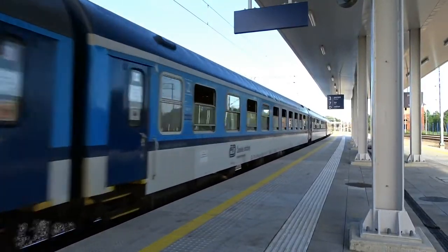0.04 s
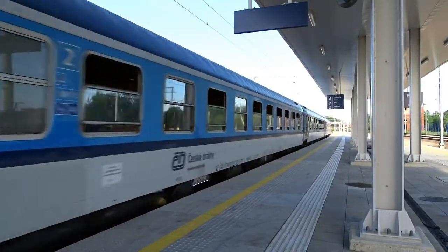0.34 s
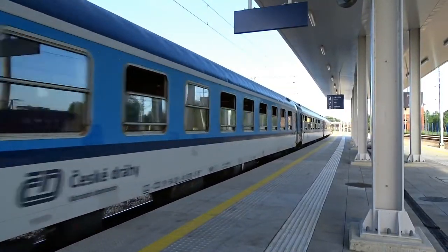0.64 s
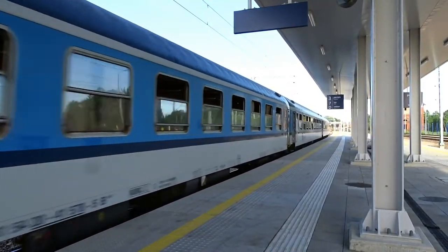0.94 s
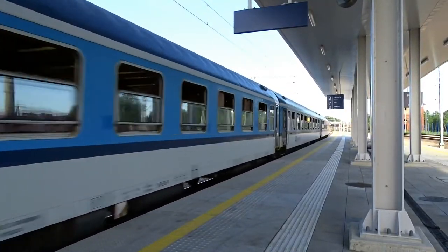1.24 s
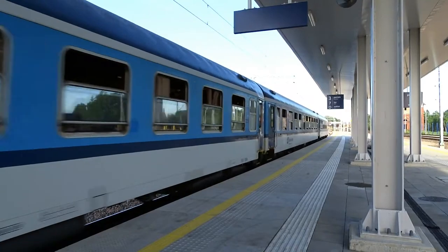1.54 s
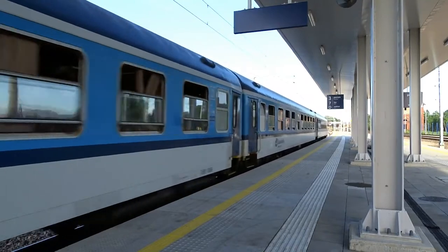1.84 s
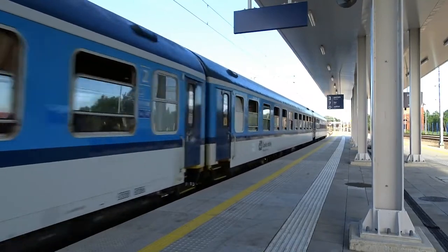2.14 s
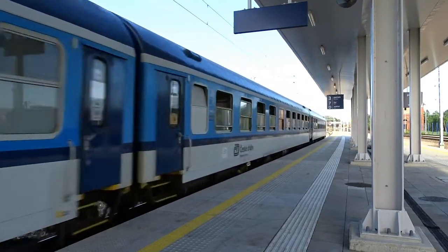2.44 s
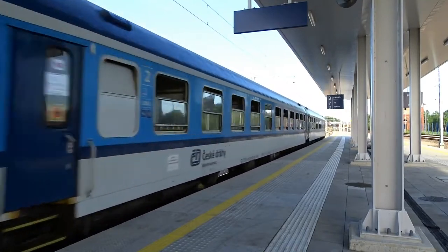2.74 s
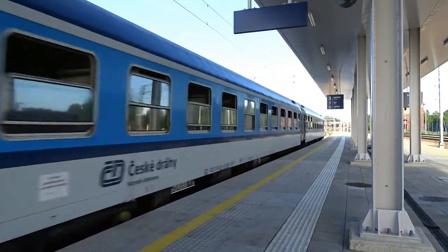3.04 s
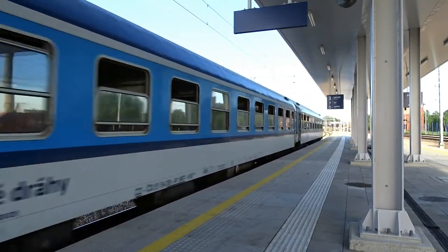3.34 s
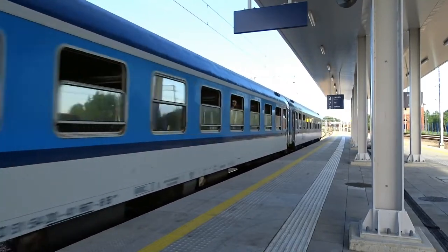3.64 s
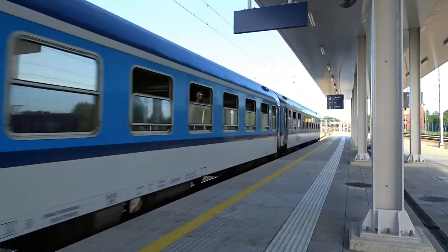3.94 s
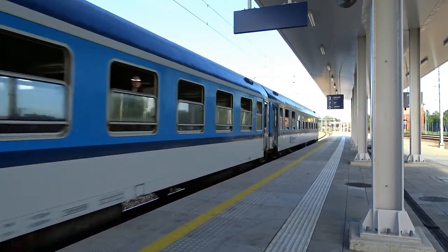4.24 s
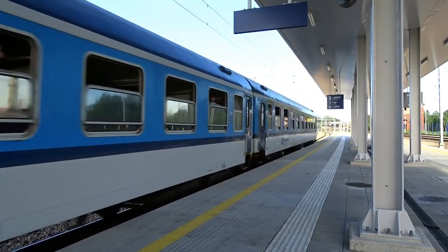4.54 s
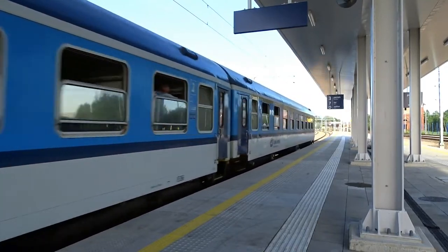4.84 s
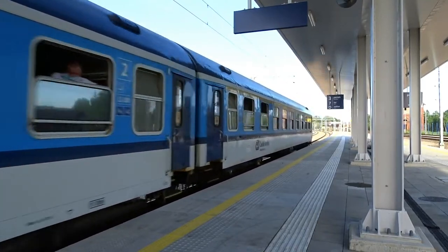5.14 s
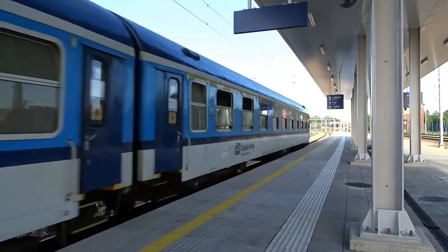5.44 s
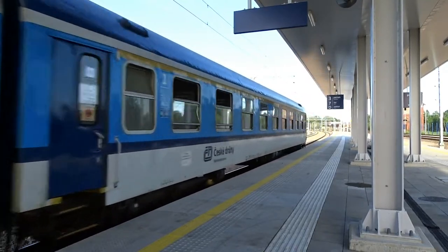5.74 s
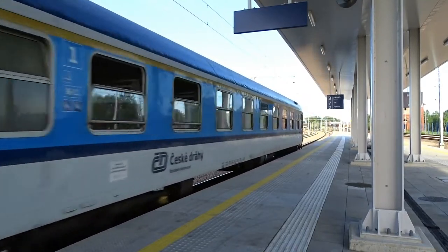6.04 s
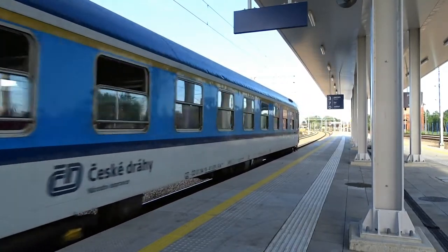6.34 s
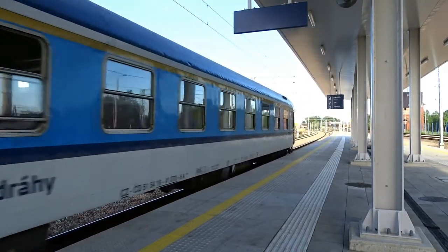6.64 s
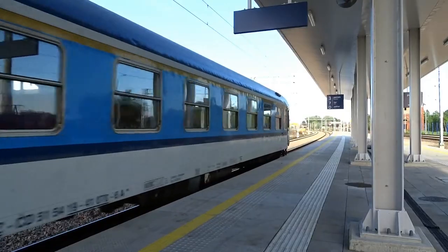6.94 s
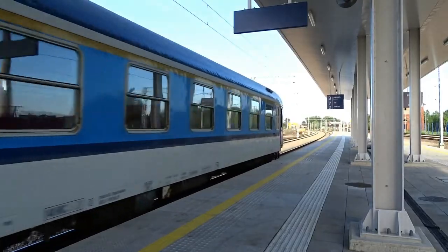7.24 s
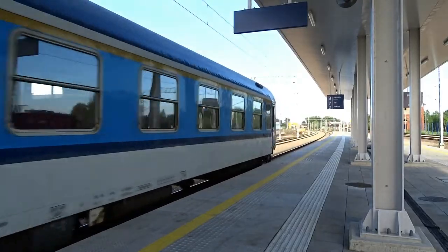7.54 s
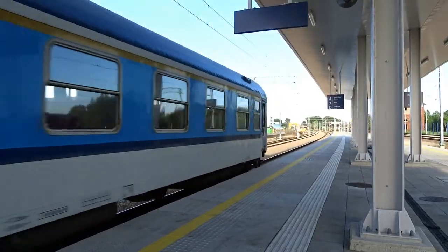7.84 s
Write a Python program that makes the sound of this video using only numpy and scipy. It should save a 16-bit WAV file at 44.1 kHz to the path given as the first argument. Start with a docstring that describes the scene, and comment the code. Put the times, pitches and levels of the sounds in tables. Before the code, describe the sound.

A braking train passes close by, its rumble and hiss sinking while shrill squeals build and end in short pips and squeaks.

```python
"""A roar of wheels on rails opens the scene: coaches roll close by, braking along a roofed platform.
Surface roughness excites this rolling noise, which sinks as smoother-running coaches arrive.
Brake friction drives high wheel modes into self-excited vibration: each squeal is a cluster of many
wheels, blurred by reflections. Bogies drone, steel parts ring and one singing wheel sweeps past;
later the brakes catch in short pips and bite with a rough squeak."""
import sys
import numpy as np
from scipy import signal
from scipy.fft import rfft, irfft, next_fast_len
from scipy.io import wavfile
from scipy.ndimage import uniform_filter1d

SR = 44100
rng = np.random.default_rng(int(sys.argv[2]) if len(sys.argv) > 2 else 0)


def unload_audio(sound):
    """Save the sound as a 16-bit wav file, at the path given as the first command line argument."""
    columns = np.transpose(np.atleast_2d(sound))
    # keep every value between -1 and 1, then stretch to whole-number steps
    steps = np.round(np.clip(columns, -1, 1) * 32767)
    wavfile.write(sys.argv[1], SR, steps.astype(np.int16))


N = 356769
TIME = np.arange(N) / SR


def from_db(db):
    """Logarithmic level: 20 dB is a tenfold amplitude."""
    return np.exp(np.asarray(db) * (np.log(10) / 20))


def unit_power(x):
    """Normalisation to a mean square of 1."""
    return x / np.sqrt(np.vdot(x, x).real / x.size + 1e-20)


def in_time(rows):
    """Linear interpolation of each column at every sample."""
    times, *columns = np.transpose(rows)
    return [np.interp(TIME, times, column) for column in columns]


def at_hz(points, hz):
    """Interpolation on a logarithmic frequency axis."""
    freqs, values = np.transpose(points)
    return np.interp(np.log(hz), np.log(freqs), values)


def flutter(rate_hz, order=2):
    """Low-pass filtered noise: a complex random envelope of unit power, whose rate may vary."""
    steps = 48   # per cycle
    clock = np.cumsum(np.broadcast_to(rate_hz, N)) * steps / SR + 2 * steps   # starts after a run-in
    pole = np.exp(-2 * np.pi / steps)
    motion = rng.standard_normal((2, int(clock[-1]) + 2))
    for _ in range(order):
        motion = signal.lfilter([1 - pole], [1, -pole], motion)
    return unit_power(np.interp(clock, np.arange(motion.shape[1]), motion[0] + 1j * motion[1]))


def drift(rate_hz):
    """Random modulation: a slow real signal of unit power."""
    return unit_power(flutter(rate_hz).real)


def swell(middle_s, length_s, peak_db, time=TIME):
    """Gaussian envelope whose length lies between its half-power points."""
    return from_db(peak_db) * np.exp2(-2 * np.minimum(((time - middle_s) / length_s) ** 2, 10))


def overlap(rows):
    """Incoherent addition of swells: their power-weighted pitch and the gain of their summed powers."""
    powers = np.array([swell(s, length, db) ** 2 for s, length, _, db in rows])
    total = powers.sum(axis=0)
    return np.array([hz for _, _, hz, _ in rows]) @ powers / total, np.sqrt(total)


def stereo(direct, reflected, coherence, pan_db):
    """Interaural coherence: direct sound is common to both ears, reflections differ."""
    coherence = np.clip(coherence, 0, 1)
    side = reflected * np.sqrt((1 - coherence) / (1 + coherence))
    return np.array([(direct + side) * from_db(pan_db / 2), (direct - side) * from_db(-pan_db / 2)])


# likeness of the noise at the two ears: (frequency [Hz], coherence [0-1])
EAR_COHERENCE = [(30, 0.99), (200, 1), (600, 0.98), (1100, 0.86), (1700, 0.95), (2400, 0.8), (3300, 0.94),
                 (4600, 0.87), (5200, 1), (9300, 1), (10000, 0.46), (10700, 1)]
# interaural level difference: (frequency [Hz], left minus right [dB])
EAR_BALANCE = [(100, .2), (300, 0.5), (1050, 2.5), (1500, 1.1), (2300, 2), (4200, 1), (5400, 2), (8500, 0),
               (10000, 0.5), (15000, -0.5)]
# interaural phase difference: (frequency [Hz], left minus right [rad])
EAR_PHASE = [(40, -.03), (200, -0.28), (500, -0.58), (1000, -0.7), (2000, -0.5), (4000, -0.2), (5300, 0)]
def contact_noise(spectrum, flicker_db, flicker_hz):
    """Random excitation: coloured stereo noise whose level flickers with the roughness of the contact."""
    size = next_fast_len(N)
    direct, reflected = rfft(rng.standard_normal((2, size)))
    hz = np.maximum(np.arange(len(direct)) * SR / size, 1)
    band_edges = 1 / (1 + (spectrum[0][0] / 2 / hz) ** 4 + (hz / 2 / spectrum[-1][0]) ** 4)
    ears = stereo(direct, reflected, at_hz(EAR_COHERENCE, hz), at_hz(EAR_BALANCE, hz))
    ears *= from_db(at_hz(spectrum, hz)) * band_edges
    ears[0] *= np.exp(1j * at_hz(EAR_PHASE, hz))
    return unit_power(irfft(ears, size)[:, :N]) * from_db(flicker_db * drift(flicker_hz))


def wheel_mode(tone, nominal_width_hz, core_share, flutter_hz, warble_hz, coherence, pan_db):
    """Superposition: the nearest wheel's warbling core tone lies in a broad cluster from the others."""
    pitch, gain = tone
    width_hz = nominal_width_hz * np.maximum(1.38 - .072 * TIME, .5)   # narrows as fewer wheels remain
    core = flutter(flutter_hz)
    core = unit_power(core / np.sqrt(0.29 + np.abs(core) ** 2))   # friction saturates, evening the swing
    core = core * np.exp(2j * np.pi * np.cumsum(warble_hz * drift(14)) / SR)
    cluster, reflected = flutter(width_hz, order=4), flutter(width_hz, order=4)
    direct = np.sqrt(core_share) * core + np.sqrt(1 - core_share) * cluster
    carrier = np.sqrt(2) * np.exp(2j * np.pi * np.cumsum(pitch) / SR)
    return gain * stereo((direct * carrier).real, (reflected * carrier).real, coherence, pan_db)


# rolling noise: (time [s], relative roar level [dB], relative hiss level [dB])
ROLLING_LEVELS = [(0.1, -22.5, -24.5), (0.27, -21, -24.5), (1.67, -24, -27.5), (1.93, -24.5, -27.5),
                  (2.54, -28.5, -30.5), (2.71, -27.5, -29), (4.35, -28, -31), (4.97, -33.5, -36.5),
                  (5.72, -41.5, -43.5), (6.79, -38, -39.5), (8.01, -41.5, -44.5), (8.05, -42, -46.5)]
# roughness of the nearest wheels: (time [s], rough share [0-1])
ROUGH_SHARE = [(0, 1), (4.3, 0.93), (5.4, 0.07), (8.09, 0)]
# spectra of rough wheels, smooth wheels and rails: (frequency [Hz], relative density [dB])
ROUGH_SPECTRUM = [(25, -36), (65, -28), (88, -20.5), (125, -30), (190, -9), (215, -4.5), (243, -8),
                  (275, -2), (325, -1.5), (410, .5), (610, -2), (690, -1.6), (980, -4), (1400, -20.5)]
SMOOTH_SPECTRUM = [(25, -30), (60, -23), (110, -15.5), (155, -8), (240, -6), (300, 1), (400, 2),
                   (460, -6.5), (545, -1.5), (595, -8), (680, -2), (1020, -4), (1130, -19), (1700, -30)]
HISS_SPECTRUM = [(700, -8), (1150, 0), (1400, 0), (1900, -1), (2400, -1.5), (3000, -3.5), (4400, -3.5),
                 (5300, -7), (6300, -7.5), (7200, -4.5), (10000, -9.5), (11200, -15), (12500, -11),
                 (15800, -19)]
def rolling_noise():
    """Roughness excitation: the contact shakes wheels and track into a roar and makes the rails hiss."""
    roar_db, hiss_db = in_time(ROLLING_LEVELS)
    rough, = in_time(ROUGH_SHARE)
    rough_roar = from_db(0.52) * contact_noise(ROUGH_SPECTRUM, flicker_db=0.4, flicker_hz=12)
    smooth_roar = from_db(1.1) * contact_noise(SMOOTH_SPECTRUM, flicker_db=1.17, flicker_hz=12)
    roar = from_db(roar_db) * (np.sqrt(rough) * rough_roar + np.sqrt(1 - rough) * smooth_roar)
    hiss = from_db(hiss_db + 2.5) * contact_noise(HISS_SPECTRUM, flicker_db=0.96, flicker_hz=25.04)
    return roar + hiss


# low vibration of the bogies: (frequency [Hz], relative density [dB])
RUMBLE_SPECTRUM = [(25, -25), (65, -23), (88, -14), (125, -9.5), (178, 4), (220, -0.5), (300, -16)]
def bogie_rumble():
    """Forced vibration: the rougher the wheels, the harder they shake the bogies."""
    rough, = in_time(ROUGH_SHARE)
    level_db = -41 * rough - 53.5 * (1 - rough)
    return from_db(level_db) * contact_noise(RUMBLE_SPECTRUM, flicker_db=-0.5, flicker_hz=10)


# rubbing of the brakes: (time [s], level [dB])
RUB_LEVELS = [(0, -44), (3, -36), (4.2, -36), (5.2, -38), (6, -34.5), (8.09, -33)]
# its spectrum: (frequency [Hz], relative density [dB])
RUB_SPECTRUM = [(2000, -13.5), (2550, -4.5), (3200, -7), (4000, -4.5), (6100, -6.5), (6600, 0.5), (7200, 1),
                (9000, -4.5), (10300, -5.5), (11200, -14), (11700, -7.5), (13000, -8), (14300, -9),
                (15150, -1.5), (15800, -4)]
def brake_rubbing():
    """Dry sliding friction radiates a broad band of high noise."""
    level_db, = in_time(RUB_LEVELS)
    return from_db(level_db) * contact_noise(RUB_SPECTRUM, flicker_db=2.0, flicker_hz=10.4)


# passing bogies: (centre time [s], duration [s], frequency [Hz], relative peak level [dB])
DRONE_SPELLS = [(.11, 0.11, 269, -25.5), (.36, 0.15, 271.4, -34), (.82, 0.46, 276, -30.5),
                (1.7, .5, 268, -36), (2.44, 0.205, 274.7, -29.5), (2.68, 0.12, 272, -32)]
def bogie_drone():
    """Resonance: a bogie shaken by roughness drones in a narrow band as it passes."""
    return from_db(-2.0) * wheel_mode(overlap(DRONE_SPELLS), nominal_width_hz=26, core_share=0.8,
                                      flutter_hz=5, warble_hz=3.1, coherence=0.93, pan_db=0)


# wheels and bogie frames: (centre time [s], duration [s], frequency [Hz], relative peak level [dB])
STEEL_RINGS = [(0.117, 0.39, 501, -35.5), (0.202, 0.35, 8620, -45), (0.553, 0.26, 664, -33),
               (0.748, 0.53, 409, -36), (1.4, .4, 540, -38), (1.498, 0.26, 696, -35),
               (1.598, 0.28, 8300, -31), (2.003, .4, 965, -41), (2.9, .4, 960, -42),
               (1.7, .6, 13830, -42.5), (2.65, 0.36, 13715, -33), (2.853, 0.5, 682, -35.5),
               (4.7, 0.71, 7800, -33), (5.152, 1.3, 8780, -30), (5.197, 0.28, 928, -46),
               (7.202, 1.32, 9340, -43), (7.35, .2, 2760, -47), (7.65, .2, 3790, -51),
               (7.87, .12, 2765, -45), (7.895, .45, 7660, -26), (7.897, .45, 8500, -30)]
def ringing_steel():
    """Interference: thin steel tones beat with their reflections, sinking in pitch as they go by."""
    fall_per_s = .006   # share of the pitch
    rings, reflections = np.zeros(N), flutter(20)
    for s, length, hz, db in STEEL_RINGS + stray_wheels(count=6):
        during = np.arange(*np.searchsorted(TIME, [s - 2 * length, s + 2 * length]))
        phase = 2 * np.pi * np.cumsum(hz * (1 - fall_per_s * (TIME[during] - s))) / SR
        shimmer = 1.11 + 0.69 * reflections[(during + rng.integers(N)) % N]
        rings[during] += swell(s, length, db, TIME[during]) * (shimmer * np.exp(1j * phase)).real
    return rings * from_db([[1.3], [.7]])   # left, right


# squealing brakes going by:
# (centre time [s], duration [s], frequency [Hz], relative peak level [dB], wheel mode [name])
SQUEAL_SPELLS = [ (.2, .7, 8833, -29, "middle"), (0.237, 1.7, 13770, -35.5, "top"),
                 (1.35, 1.9, 8732, -21.5, "middle"), (1.35, .5, 13840, -32, "top"),
                 (1.85, 1.22, 7675, -30, "main"), (2.417, 1.6, 13670, -23.5, "top"),
                 (2.995, .44, 7695, -31, "main"), (3.746, 1.5, 8660, -21.5, "middle"),
                 (3.942, 1.2, 13460, -32.5, "top"), (3.8, .52, 4656, -32, "low"),
                 (4.281, .5, 4670, -32, "low"), (4.311, 1.22, 7650, -20.5, "main"),
                 (5.028, .84, 8730, -23.5, "middle"), (5.12, 0.708, 4673, -35, "low"),
                 (5.25, 1.15, 9580, -23, "upper"), (6.385, 1.7, 7608, -20.5, "main"),
                 (6.391, 1.9, 8530, -20.5, "middle"), (7.101, 2.2, 4682, -30.5, "low"),
                 (7.699, 0.73, 8520, -21.5, "middle"), (7.794, 1.4, 9450, -29, "upper"),
                 (8.09, 0.54, 4686, -34, "low"), (8.2, 1.74, 7580, -17, "main")]
def brake_squeal():
    """Self-excited vibration: brake friction sustains five high modes of the wheels."""
    def mode(name, gain_db, **voice):
        tone = overlap([row[:-1] for row in SQUEAL_SPELLS if row[-1] == name])
        return from_db(gain_db) * wheel_mode(tone, **voice)

    return (mode("low", gain_db=0.4, nominal_width_hz=225, core_share=0.34,
                 flutter_hz=10, warble_hz=3.134, coherence=0.87, pan_db=1.0)
            + mode("main", gain_db=-0.47, nominal_width_hz=295, core_share=0.34,
                   flutter_hz=18, warble_hz=60.01, coherence=0.97, pan_db=0.1)
            + mode("middle", gain_db=-0.5, nominal_width_hz=380, core_share=0.075,
                   flutter_hz=25.1, warble_hz=79.8, coherence=0.93, pan_db=-0.4)
            + mode("upper", gain_db=1.1, nominal_width_hz=360, core_share=0.17,
                   flutter_hz=25.12, warble_hz=45, coherence=0.77, pan_db=2.0)
            + mode("top", gain_db=-1.2, nominal_width_hz=620, core_share=0.12,
                   flutter_hz=40.1, warble_hz=59.7, coherence=0.95, pan_db=2.5))


def stray_wheels(count):
    """Frequency scatter: single wheels stand out of each high squeal, as rows like STEEL_RINGS."""
    length_s, scatter_hz, relative_db = .22, 190, -9.5
    high_squeals = [row[:-1] for row in SQUEAL_SPELLS if row[-1] != "low"]
    return [(s + when * length / 2, length_s, hz + detune * scatter_hz, db + relative_db)
            for s, length, hz, db in high_squeals
            for when, detune in rng.uniform(-1, 1, (count, 2))]


def passing_wheel():
    """Doppler effect and spherical spreading: one singing wheel sweeps by near the platform edge."""
    nearest_s, nearest_m, speed_m_per_s, sound_m_per_s = .82, 3.6, 7.7, 343
    wheel_hz, peak_db = 8960, -30
    along_m = speed_m_per_s * (TIME - nearest_s)
    range_m = np.hypot(along_m, nearest_m)
    pitch = wheel_hz * (1 - speed_m_per_s / sound_m_per_s * along_m / range_m)
    gain = from_db(peak_db) * nearest_m / range_m
    return wheel_mode((pitch, gain), nominal_width_hz=180, core_share=0.52,
                      flutter_hz=25, warble_hz=20.5, coherence=0.71, pan_db=3.0)


# worn treads going by: (centre time [s], duration [s], peak level [dB])
RASP_SPELLS = [(1.8, 0.78, -32.5), (2.75, 0.24, -39), (4.848, 0.32, -40)]
# their spectrum: (frequency [Hz], relative density [dB])
RASP_SPECTRUM = [(900, -7), (1300, -0.5), (1850, 3.5), (2450, -8), (3000, -22)]
def tread_rasp():
    """Roughness excitation: worn treads shake the steel in swells of mid-band noise."""
    envelope = sum(swell(*tread) for tread in RASP_SPELLS)
    return envelope * contact_noise(RASP_SPECTRUM, flicker_db=1.0, flicker_hz=30)


# a brake catches: (time [s], peak level [dB])
CATCHES = [(4.68, -35), (5.0, -36), (5.41, -31.5), (5.8, -36), (6.019, -33.5), (6.37, -25.5), (6.499, -33),
           (6.78, -25.5), (6.88, -29), (6.96, -30), (7.15, -29.5), (7.35, -29), (7.44, -28)]
def brake_pips():
    """Single-mode resonance: a catching brake rings the lowest wheel mode in nearly pure pulses."""
    mode_hz, pip_s = 4676, 0.038
    phase = 2 * np.pi * np.cumsum(mode_hz + 6 * drift(14)) / SR
    return np.sqrt(2) * np.sin(phase) * sum(swell(s, pip_s, db) for s, db in CATCHES)


# a brake bites: (centre time [s], duration [s], relative peak level [dB])
BITE_SPELLS = [(7.35, .17, -37.5), (7.87, 0.09, -33), (8.07, 0.047, -38)]
# its partials: (frequency ratio [1], relative level [dB], nominal width [Hz])
SQUEAK_PARTIALS = [(1, -9, 380.4), (1.105, -13, 130), (4.1, -7, 380), (5, -3, 463)]
def biting_brake():
    """Friction excites several partials at once; random modulation broadens them into a rough squeak."""
    lowest_hz = 2524
    phase = 2 * np.pi * lowest_hz * TIME
    partials = sum(from_db(db) * flutter(width * .8, order=3).real * np.cos(ratio * phase)
                   for ratio, db, width in SQUEAK_PARTIALS)
    return 2 * partials * sum(swell(*bite) for bite in BITE_SPELLS)


def scene():
    """Linear superposition of rolling noise, brakes and ringing steel."""
    rolling, rumble, rasp, drone = rolling_noise(), bogie_rumble(), tread_rasp(), bogie_drone()
    rail_bumps = from_db(0.28 * drift(14))   # raise roar, hiss and rasp together
    running_gear = (rolling + rasp) * rail_bumps + rumble + drone
    coach_s, leftmost_s = 3.4, 3.2   # the squeal swings left and right once a coach
    sway_db = .75 * np.cos(2 * np.pi * (TIME - leftmost_s) / coach_s)
    squeal = (brake_squeal() + passing_wheel() + brake_pips()) * from_db([sway_db / 2, -sway_db / 2])
    return running_gear + squeal + biting_brake() + brake_rubbing() + ringing_steel()


def record(dry):
    """Dynamic compression holds the loudest moments down; a steep low-pass cuts the top."""
    window_s, threshold_db, reduction, cutoff_hz = 0.0053, -17, .45, 15700
    power = uniform_filter1d(np.mean(dry ** 2, axis=0), size=round(window_s * SR))
    excess_db = np.maximum(10 * np.log10(power + 1e-12) - threshold_db, 0)
    low_pass = signal.ellip(12, .1, 95, cutoff_hz, fs=SR, output="sos")
    return signal.sosfilt(low_pass, dry * from_db(-reduction * excess_db))


dry = scene()
out = record(dry)
unload_audio(out)
```